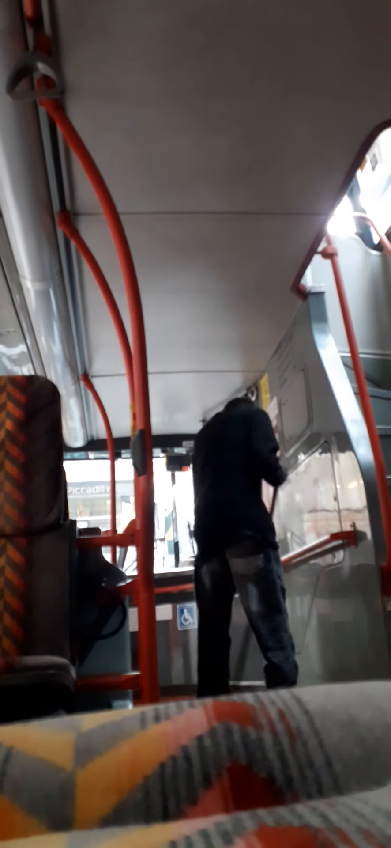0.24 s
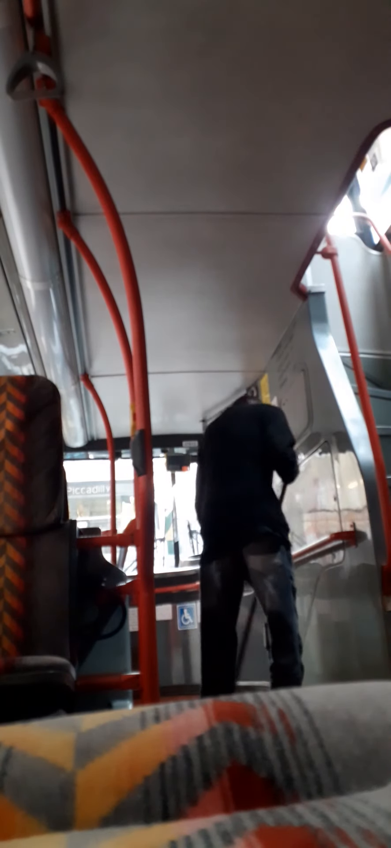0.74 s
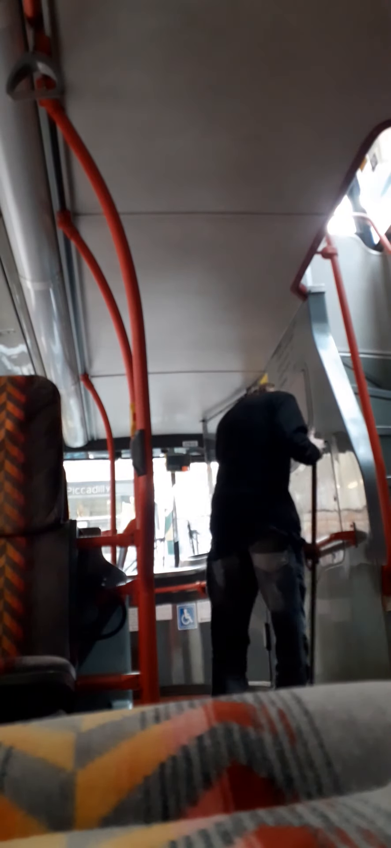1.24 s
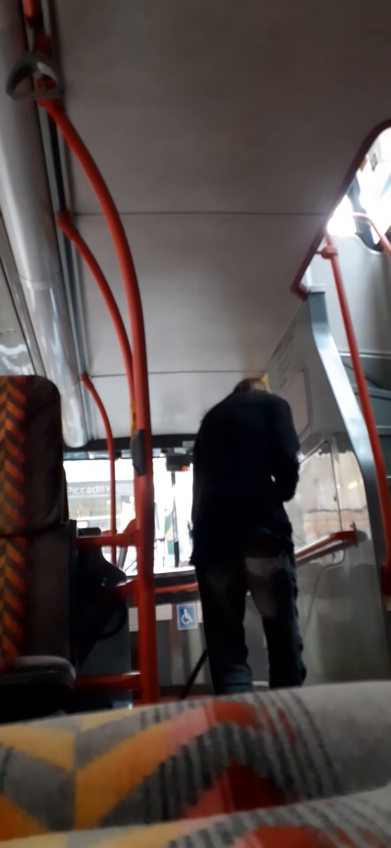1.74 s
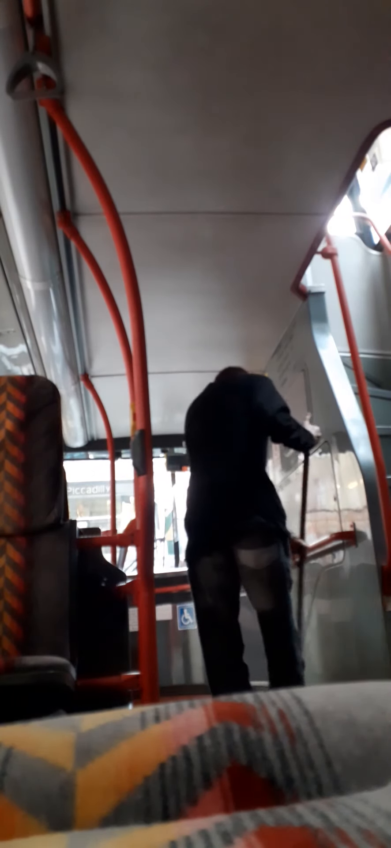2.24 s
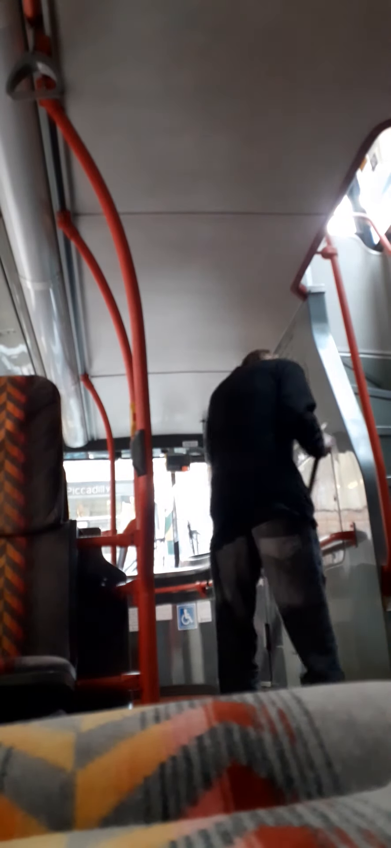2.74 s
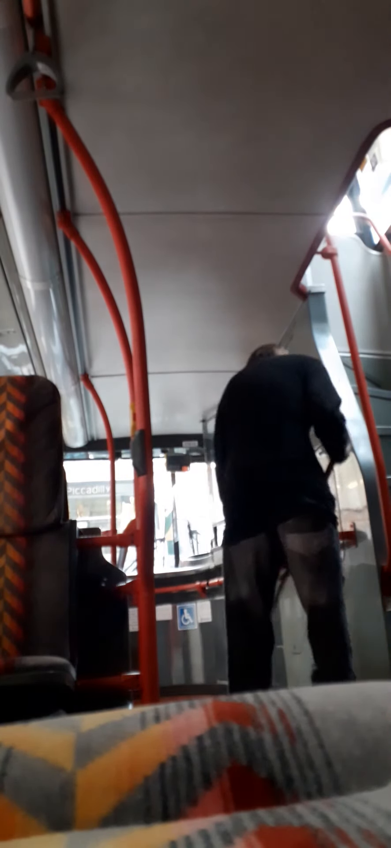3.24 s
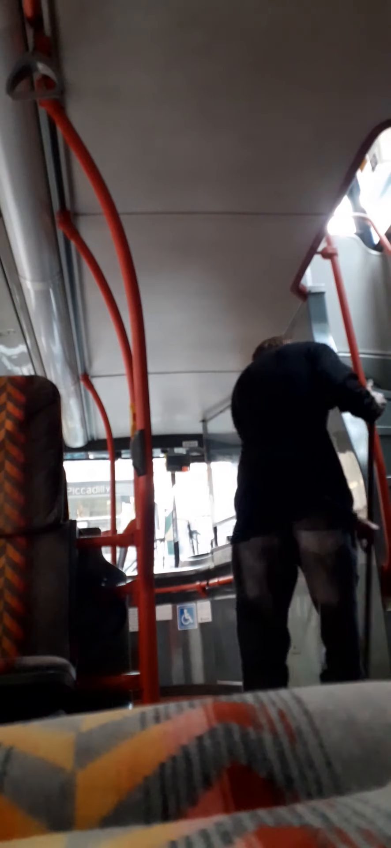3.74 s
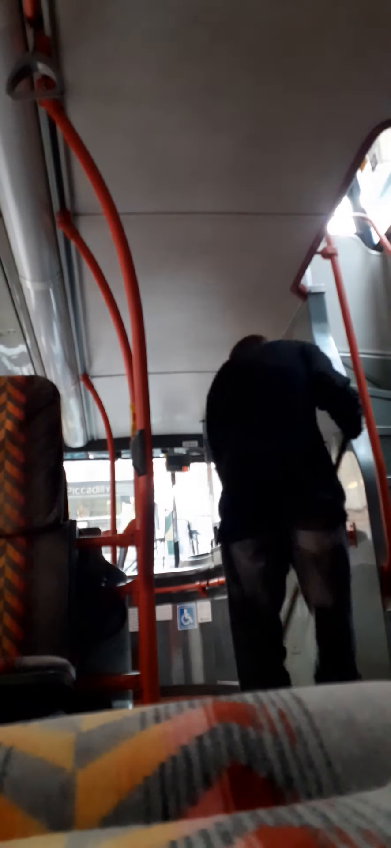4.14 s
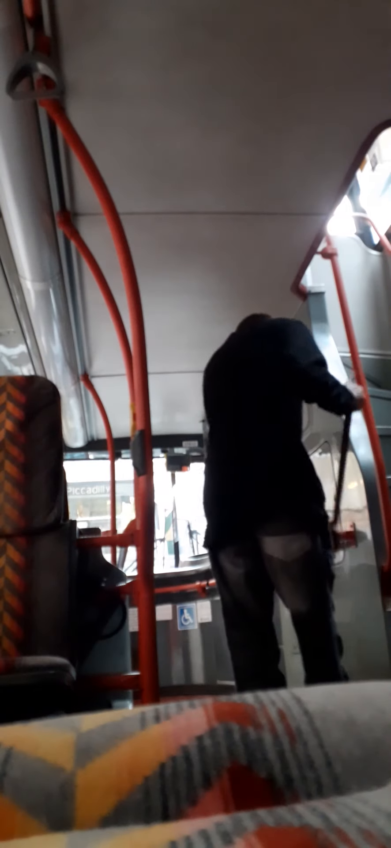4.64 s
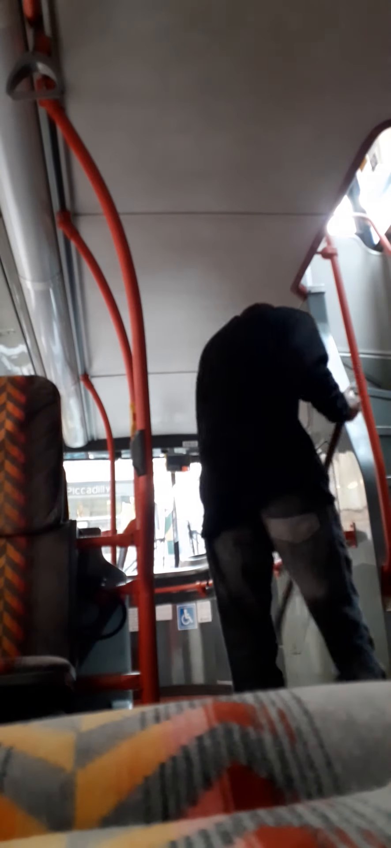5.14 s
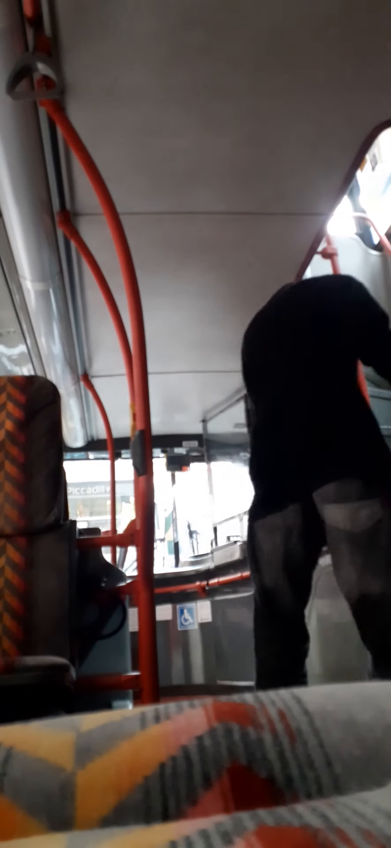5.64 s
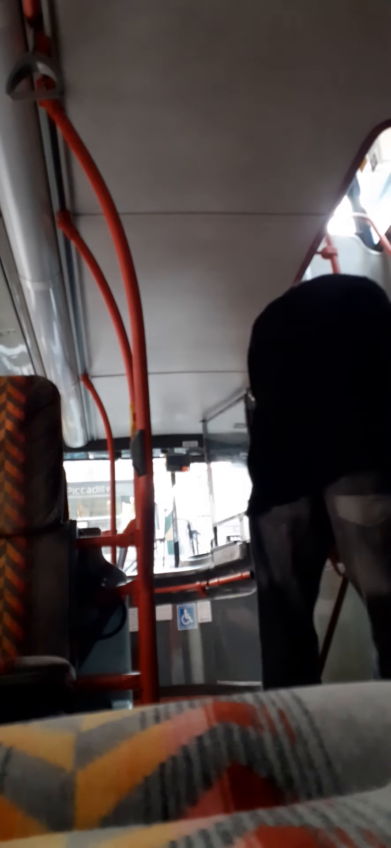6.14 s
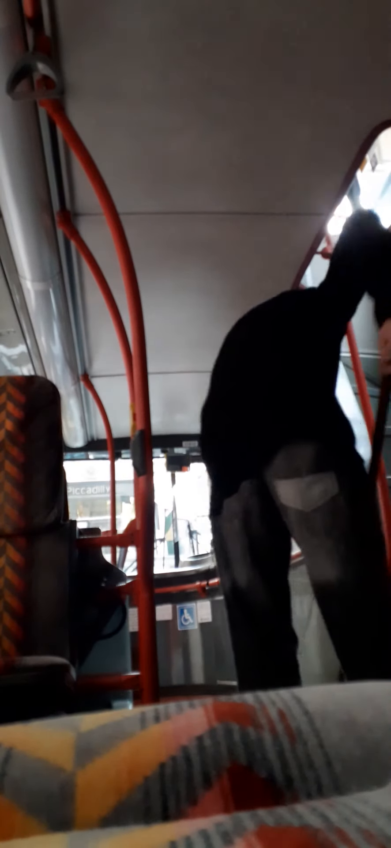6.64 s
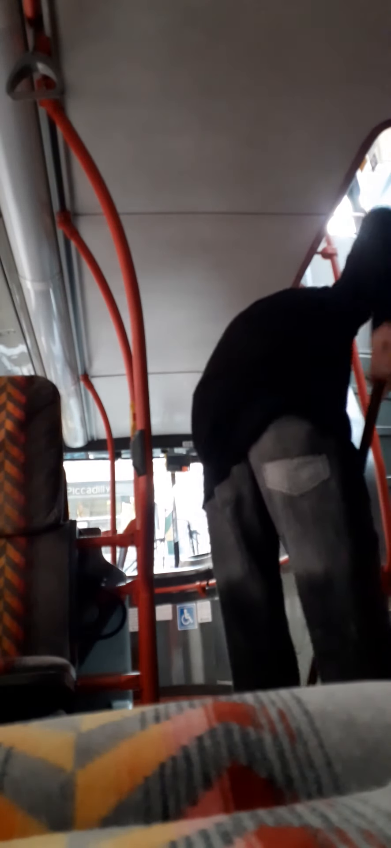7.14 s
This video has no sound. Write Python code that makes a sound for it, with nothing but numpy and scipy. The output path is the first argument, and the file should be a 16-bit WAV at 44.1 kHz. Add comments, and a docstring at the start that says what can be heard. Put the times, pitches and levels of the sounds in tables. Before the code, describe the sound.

A long-handled brush scrubs the gritty floor of a parked bus, a few metres away, with a brief cabin echo and a faint hush of air underneath. From the start, fairly quiet rasping strokes go to and fro about twice a second, the bristles fizzing and the brush head chattering lightly. Soft dull knocks fall between 2 and 3.5 seconds, and small squeaks come at about 3.8, 4.7 and 5.3 seconds. From 5.2 seconds the strokes press harder and the hollow floor rumbles, with firmer knocks around 5.6, 5.9 and 6.4 seconds. At about 6.6 seconds a loud knock and a low boom lead into one hard shove, which gives a short loud hiss and a brief groan at 6.75 seconds. After a lighter pull, another knock at 7.2 seconds starts a last loud, rumbling scrape with a squeak.

```python
"""Rasping strokes go to and fro: a long-handled brush scrubs the floor of a parked bus, a few metres away.
Bristles catch on the gritty covering, the brush head chatters and squeaks, and under pressure the hollow
floor rumbles. Dull knocks fall here and there; late on, one hard shove gives a short loud hiss.
The cabin adds a brief echo, and a faint hush of air lies under it all."""
import sys
import numpy as np
from scipy import signal
from scipy.fft import rfft, irfft, next_fast_len
from scipy.io import wavfile
from scipy.ndimage import map_coordinates

SR = 44100
rng = np.random.default_rng(int(sys.argv[2]) if len(sys.argv) > 2 else 0)


def digitize_waveform(pressure):
    """Quantize a signal to 16-bit integers and store it at the path in sys.argv[1].

    Rows of a 2-D input are taken as channels; values are limited to [-1, 1].
    """
    field = np.atleast_2d(pressure).T
    bounded = np.clip(field, -1, 1)
    quanta = np.round(bounded * 32767).astype(np.int16)
    wavfile.write(sys.argv[1], SR, quanta)


N = 326335
TIME = np.arange(N) / SR


def amp(db):
    """Turn decibels into a gain."""
    return 10 ** (np.asarray(db) / 20)


def unit(x):
    """Scale to an average (rms) level of 1."""
    return x / np.sqrt(np.mean(x ** 2) + 1e-20)


def along(points, hz):
    """Read between (Hz, value) points on a pitch scale."""
    freqs, values = np.transpose(points)
    return np.interp(np.log(hz + 1), np.log(freqs + 1), values)


def wobble(rate):
    """A random curve that turns rate times a second."""
    points = rng.standard_normal(int(N * rate / SR) + 4)
    return map_coordinates(points, [TIME * rate], order=1)


def filtered(x, response):
    """Give each frequency in x the gain that response asks for."""
    size = next_fast_len(N + SR // 2)
    return irfft(rfft(x, size) * response(np.fft.rfftfreq(size, 1 / SR)), size)[..., :N]


def colour(points):
    """A tone colour drawn through (Hz, dB) points."""
    return lambda hz: amp(along(points, hz))


def body(modes, low_hz, high_hz):
    """The tone colour of a ringing object, fading below low_hz and above high_hz."""
    def response(f):
        ring = sum((-1) ** k * amp(db) * 1j * f * width / (hz * hz - f * f + 1j * f * width)
                   for k, (hz, width, db) in enumerate(modes))
        bass_cut = 1j * f / (low_hz + 1j * f)
        treble_cut = 1 / (1 + np.sqrt(2) * 1j * f / high_hz - (f / high_hz) ** 2)
        return ring * bass_cut * treble_cut
    return response


def slips(rate, scatter_db):
    """Sticking and slipping: two streams of tiny random clicks, about rate a second."""
    released = rng.random((2, N)) < rate / SR
    direction = np.sign(rng.standard_normal((2, N)))
    return unit(released * direction * amp(scatter_db * rng.standard_normal((2, N))))


# How alike left and right sound. Each row: frequency in Hz, likeness from -1 to 1.
LIKENESS = [(60, .8), (120, 1), (200, 1), (300, .96), (640, .85), (1100, -.15), (1500, -.39), (2200, 0),
            (3500, -.05), (15000, 0)]
# How much louder the left is. Each row: frequency in Hz, left minus right in dB.
BALANCE = [(60, 7.2), (200, 3), (380, 3.8), (700, 0.52), (1290, 1.9), (2380, 10.1), (4400, 9.4),
           (8120, 4.4), (15000, 5.2)]
def stereo(pair, response):
    """Colour two unrelated signals and spread them left and right; their mean has level 1."""
    def spread(hz):
        angle = np.arccos(np.clip(along(LIKENESS, hz), -1, 1)) / 2
        return response(hz) * np.array([np.cos(angle), np.sin(angle)])
    mid, side = filtered(pair, spread)
    ears = np.array([mid + side, mid - side])
    ears = filtered(ears, lambda hz: amp(np.outer([1, -1], along(BALANCE, hz)) / 2))
    return ears / np.sqrt(np.mean(ears.mean(axis=0) ** 2) + 1e-20)


# The colour of the air. Each row: frequency in Hz, relative level in dB.
AIR = [(25, -17), (60, 9.5), (150, -1), (450, 10), (1000, 6), (3000, -1), (7000, -11), (9500, -15),
       (15000, -6)]
def air_hush():
    """A faint steady hush of air in the parked bus."""
    return amp(-59.5) * stereo(rng.standard_normal((2, N)), colour(AIR))


# The cabin's echo. Each row: frequency in Hz, seconds to fade by 60 dB.
ECHO_TIMES = [(200, 0.13), (2000, 0.21), (10000, 0.12)]
def cabin_echo(x, wet_db):
    """Close walls and windows add a short dense echo, which changes as the brush moves about."""
    hop, length = SR // 6, SR // 3
    padded = np.pad(x, ((0, 0), (hop, 2 * hop)))
    window = np.sin(np.pi * np.arange(2 * hop) / (2 * hop))
    echo = np.zeros((2, padded.shape[1] + length))
    for start in range(0, N + hop, hop):  # each piece gets a new random tail
        hz, t, noise = signal.stft(rng.standard_normal((2, length)), SR, nperseg=256)
        decay = amp(-60 * t / along(ECHO_TIMES, hz)[:, None])
        tail = signal.istft(noise * decay, SR, nperseg=256)[1][:, :length]
        piece = padded[:, start:start + 2 * hop] * window
        answer = signal.fftconvolve(piece, tail / np.linalg.norm(tail[0]), axes=1)
        echo[:, start:start + answer.shape[1]] += answer
    return (x + amp(wet_db) * echo[:, hop:hop + N]) / np.hypot(1, amp(wet_db))


# The notes of the struck floor. Each row: pitch in Hz, relative level in dB, seconds to fade by 60 dB.
KNOCK_NOTES = [(89, -16, 0.21), (135.5, -5.5, 0.23), (175.5, 8.5, 0.15), (212, -11, 0.2), (286.4, 0, 0.081),
               (332, -18, 0.074), (440, -11.5, 0.13), (604, -13, 0.11)]
# Blows on the floor. Each row: start in seconds, level in dB, boost of the deep thud in dB.
KNOCKS = [(0.169, -44, -2), (2.058, -44, 4), (2.604, -41.5, 0), (2.678, -31.5, -5), (3.222, -41, -16),
          (3.25, -38, -3), (3.512, -40.5, -20), (5.407, -36.5, 3), (5.605, -28, -10), (5.872, -23, -14),
          (6.394, -27.5, -6), (6.62, -21.5, -13), (6.648, -14, -24), (6.945, -30, -10), (7.238, -24.5, -10)]
def knocks():
    """Each soft blow rings the floor a little differently and leaves a deep thud."""
    t = np.arange(SR // 2) / SR
    out = np.zeros(N + len(t))
    deep = signal.butter(2, [38, 85], "bandpass", fs=SR, output="sos")
    for start, db, thud_db in KNOCKS:
        ring = 0
        for hz, note_db, fade_s in KNOCK_NOTES:
            decay = amp(note_db + rng.normal(0, 4.0) - 60 * t / fade_s)
            ring += decay * np.sin(2 * np.pi * hz * (1 + 0.019 * rng.normal()) * t)
        ring *= 1 - np.exp(-t / 0.0037)  # a soft start
        thud = unit(signal.sosfilt(deep, rng.standard_normal(len(t)))) * amp(-60 * t / 0.39)
        blow = ring / np.abs(ring).max() + amp(thud_db - 8) * thud
        out[round(start * SR):][:len(t)] += amp(db - 2.0) * blow
    return out[:N] * amp([[1.6], [-1.6]])  # louder on the left


# The floor under the moving brush. Each row: time in seconds, hollow share from 0 to 1.
HOLLOWNESS = [(0, 0.09), (5.2, 0.8), (5.6, 0.4), (6.0, 0.9), (7.4, 0.97)]
# The notes of the hollow panels. Each row: pitch in Hz, width in Hz, relative level in dB.
PANEL_NOTES = [(101, 18, -16), (113.7, 12, -8), (155, 20.3, -5), (174, 9.7, 3), (212, 14.5, 3),
               (237.7, 16, -4), (282, 15, -1.5), (341, 13, -9)]
# The colours of solid floor and shaking chassis. Each row: frequency in Hz, relative level in dB.
SOLID_FLOOR = [(25, -44), (45, -44), (75, -11), (115, -10), (150, -5.5), (180, -2), (210, -7), (245, 0),
               (320, 0.5), (420, -4.5), (600, -29), (1200, -43)]
CHASSIS = [(25, -36), (45, -18), (60, -1), (85, -19), (115, 4), (140, 2), (250, -44)]
def floor_rumble(rumble_db):
    """The dragging brush shakes the bus: solid floor rubs, hollow panels boom, the chassis shudders."""
    hollow = np.clip(np.interp(TIME, *np.transpose(HOLLOWNESS)), 0, 1)
    rub = stereo(slips(rate=1500, scatter_db=2), colour(SOLID_FLOOR))
    boom = stereo(slips(rate=600, scatter_db=1.5), body(PANEL_NOTES, low_hz=161, high_hz=560))
    shudder = amp(-23) * stereo(slips(rate=510, scatter_db=-0.5), colour(CHASSIS))
    gain = amp(rumble_db + 1.7 * wobble(25))
    return gain * (np.sqrt(1 - hollow) * rub + np.sqrt(hollow) * boom + shudder)


# Squeaks and groans of the dragging head. Each row: middle in seconds, length in seconds,
# pitch in Hz, glide as a share of the pitch, width in Hz, level in dB.
SQUEAKS = [(0.9, .08, 244.7, 0.015, 20, -43), (2.009, 0.047, 243.6, 0.035, 24, -43),
           (2.95, 0.049, 494, 0.015, 112.6, -44), (3.808, 0.062, 800, 0.035, 250, -36.5),
           (3.85, 0.048, 2000, 0.035, 370, -39.5), (4.737, 0.071, 1754, 0.24, 980, -42),
           (4.942, .3, 277, 0.012, 39, -55), (5.275, 0.08, 557, 0.0068, 44.6, -36),
           (5.343, .04, 2530, .03, 350, -46), (6.244, .06, 516, 0.149, 170, -39.5),
           (6.725, .09, 540, 0.063, 118, -24.5), (7.379, .07, 700, 0.00062, 57, -25)]
def squeaks():
    """Now and then the slipping gathers around one rough, fluttering pitch."""
    out = np.zeros((2, N))
    for middle, length, hz, glide, width_hz, db in SQUEAKS:
        near = np.abs(TIME - middle) < 1.5 * length
        t = TIME[near]
        offset = (t - middle) / length
        real, imaginary = rng.standard_normal((2, 200))
        flutter = np.interp((t - t[0]) * width_hz, np.arange(len(real)), real + 1j * imaginary)
        cycles = np.cumsum(hz * (1 + glide * offset)) / SR
        tone = unit(np.real(flutter * np.exp(2j * np.pi * cycles)))
        pan = amp(np.array([[1], [-1]]) * along(BALANCE, hz) / 2)
        out[:, near] += amp(db) * np.exp(-2 * offset ** 2) * tone * pan
    return out


# The notes of the head and handle. Each row: pitch in Hz, width in Hz, relative level in dB.
HEAD_NOTES = [(409.3, 66, 1), (468, 39, 5), (523, 112, 2.5), (648.5, 22.4, 4), (689, 48, -0.5),
              (916, 210, -4)]
def brush_head(chatter_db):
    """The head chatters over the floor and rings with its handle."""
    judder_db = 1.55 * wobble(45)
    ring = stereo(slips(rate=900, scatter_db=1.5), body(HEAD_NOTES, low_hz=242, high_hz=1240))
    return amp(chatter_db + .5 + judder_db) * ring


# The colour of the skid. Each row: frequency in Hz, relative level in dB.
SKID_HISS = [(300, -29), (820, -11), (1100, 0.5), (1350, -2), (1650, -1.5), (2200, -3), (2500, -11),
             (2900, -9), (4300, -13.5), (6500, -25), (8200, -25.5), (9300, -40), (12200, -31.5),
             (15500, -38)]
def shove(start_s, db):
    """The brush bites at once on a hard shove and skids with a short hiss."""
    bite_s, skid_s = 0.015, 0.082
    skid_db_per_s, stop_db_per_s = 68, 152
    age = TIME - start_s
    bite = np.clip(age / bite_s, 0, 1)
    fall_db = skid_db_per_s * np.clip(age, 0, skid_s) + stop_db_per_s * np.maximum(age - skid_s, 0)
    gain = bite * amp(db - fall_db + 0.52 * wobble(90))
    return gain * stereo(slips(rate=3500, scatter_db=0.5), colour(SKID_HISS))


# The colours of tips, light tufts and pressed tufts. Each row: frequency in Hz, relative level in dB.
TIP_FIZZ = [(800, -39), (2000, -23), (4000, 3.5), (6000, 0), (8200, 1), (9300, -9.5), (10300, -5.5),
            (12200, -2), (15500, -6.5)]
LIGHT_RASP = [(200, -23), (600, -11), (1000, 1), (1400, 3), (1900, 0.5), (2500, -2.5), (3700, -5.5),
              (5000, -11.5), (7000, -19), (12000, -30)]
PRESSED_RASP = [(200, -24), (600, -17), (1100, 4), (1400, -1), (1850, -1), (2500, -11), (3700, -14),
                (5000, -21), (7000, -26.5), (12000, -41)]
def bristles(fizz_db, rasp_db, chatter_db):
    """Tips flick over the grit; pressed harder, whole tufts catch and let go and the rasp darkens."""
    bent = np.clip((chatter_db + 47) / 25, 0, 1)  # share of the bristles bent flat
    tufts = wobble(60)
    fizz = amp(fizz_db + .5 * tufts) * stereo(slips(rate=20000, scatter_db=-1), colour(TIP_FIZZ))
    light = stereo(slips(rate=5000, scatter_db=-0.5), colour(LIGHT_RASP))
    heavy = stereo(slips(rate=3500, scatter_db=5.5), colour(PRESSED_RASP))
    return fizz + amp(rasp_db + 0.68 * tufts) * (np.sqrt(1 - bent) * light + np.sqrt(bent) * heavy)


# Moments of extra weight on the handle. Each row: middle in seconds, length in seconds,
# then levels in dB of rasp, chatter and rumble.
PRESSES = [(.06, 0.065, -46, -39.5, -42), (0.853, 0.18, -44, -43.5, -44.5), (1.413, .07, -55, -48.5, -69),
           (2.018, .049, -39, -48, -50), (2.496, 0.082, -39, -43, -62), (2.555, 0.069, -43, -49.5, -44.5),
           (2.861, 0.11, -41, -45.5, -55), (3.285, 0.12, -39, -35, -39.5), (3.538, 0.066, -48.5, -44, -44),
           (3.734, 0.091, -39, -38.5, -53), (3.842, 0.069, -38, -40, -44), (4.767, 0.12, -40.5, -41, -51.5),
           (5.209, 0.071, -37, -31.5, -44), (5.337, .038, -45, -48, -45.5),
           (5.649, 0.098, -30.5, -29, -26.5), (5.774, .093, -39, -38, -40), (6.024, 0.075, -53, -35, -38),
           (6.096, .115, -44, -43, -29), (6.686, .055, -54, -35, -15.5), (6.755, 0.07, -35, -26, -16),
           (6.817, 0.089, -26, -28, -26.5)]
def press_power():
    """Extra weight makes the head catch: a short swell in power, quicker up than down."""
    power = 0
    for middle, length, *db in PRESSES:
        width = np.where(TIME < middle, 0.73 * length, length)
        swell = np.exp(-2 * ((TIME - middle) / width) ** 2)
        power += (amp(db)[:, None] * swell) ** 2
    return power


# Pushes and pulls of the brush. Each row: start in seconds, length in seconds, moment of top speed
# as a share of the length, then levels in dB of fizz, rasp, chatter and rumble.
STROKES = [(-.149, 0.35, .19, -44.5, -38, -42.5, -44), (0.186, 0.39, 0.52, -47, -39.5, -44, -51.5),
           (.5, 0.59, .52, -50, -42, -45.5, -58.5), (0.997, 0.43, 0.59, -49.5, -42, -46, -52),
           (1.331, 0.51, 0.6, -47.5, -39, -47, -52), (1.781, .49, 0.55, -46.5, -41, -46, -52),
           (2.2, 0.48, 0.66, -49.5, -39.5, -45.5, -55.5), (2.591, .48, 0.6, -49.5, -44.5, -48, -59),
           (2.979, 0.52, 0.59, -48.5, -39.5, -48.5, -68.5), (3.366, 0.69, 0.57, -49, -42, -47, -53.5),
           (3.824, 0.7, 0.58, -49.5, -42.5, -55.5, -69.5), (4.425, .53, .7, -49.5, -44.5, -53, -68),
           (4.837, .6, 0.68, -48.5, -40.5, -43.5, -50.5), (5.316, 0.59, .66, -48, -37.5, -40.5, -48),
           (5.772, 0.53, 0.56, -51.5, -43.5, -43.5, -41), (6.129, .28, 0.65, -63, -42.5, -42, -46),
           (6.27, 0.44, 0.68, -55.2, -47.2, -51, -51), (6.599, 0.45, 0.39, -54, -32, -39, -34),
           (6.925, 0.4, 0.59, -58, -48, -53, -58), (7.225, 0.43, 0.6, -49, -21, -17.5, -15.5)]
def scrubbing_levels():
    """Four levels in dB: each stroke speeds up and slows to a halt, and presses add to it."""
    steepness = np.array([[2.1], [2.42], [1.64], [1.45]])  # how fizz, rasp, chatter, rumble follow speed
    power = np.zeros((4, N))
    for start, length, crest, *db in STROKES:
        moving = (TIME > start) & (TIME < start + length)
        progress = (TIME[moving] - start) / length
        travel = np.interp(progress, [0, np.clip(crest, .05, .95), 1], [0, .5, 1])
        speed = np.abs(np.sin(np.pi * travel))
        power[:, moving] += (amp(db)[:, None] * speed ** steepness) ** 2
    power[1:] += press_power()  # all but the fizz
    return 10 * np.log10(power + 1e-12)


def scene():
    """The scraping echoes in the cabin; the low sounds come straight through the floor."""
    fizz_db, rasp_db, chatter_db, rumble_db = scrubbing_levels()
    friction = bristles(fizz_db, rasp_db, chatter_db) + shove(start_s=6.744, db=-16.5) + squeaks()
    airborne = cabin_echo(friction, wet_db=-8.5)
    return airborne + brush_head(chatter_db) + floor_rumble(rumble_db) + knocks() + air_hush()


def record(dry):
    """Cut the highest treble and end without a click."""
    top_hz, fade_s = 15800, .002
    fade = np.sin(np.pi / 2 * np.clip(TIME[::-1] / fade_s, 0, 1)) ** 2
    return filtered(dry * fade, lambda hz: hz < top_hz)


dry = scene()
out = record(dry)
digitize_waveform(out)
```